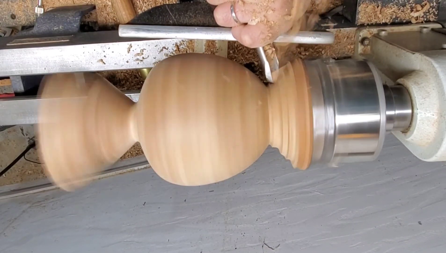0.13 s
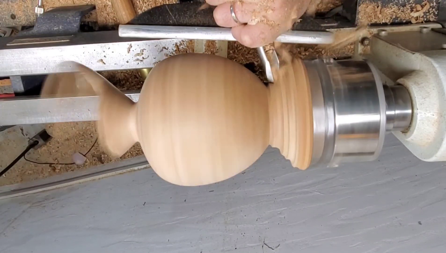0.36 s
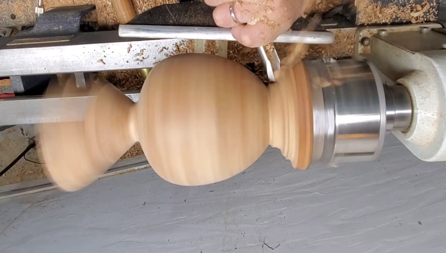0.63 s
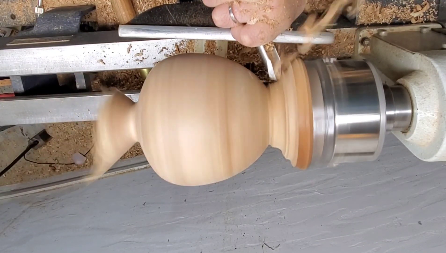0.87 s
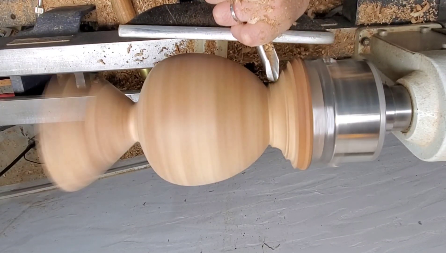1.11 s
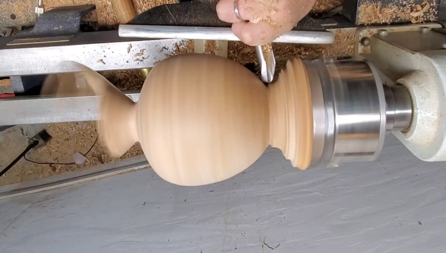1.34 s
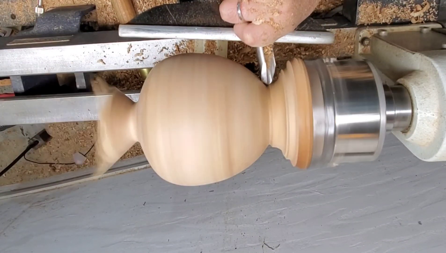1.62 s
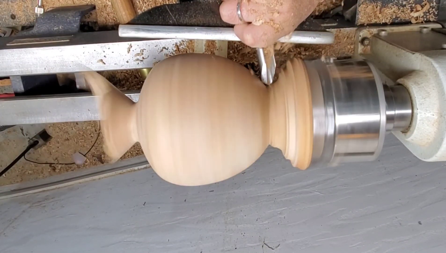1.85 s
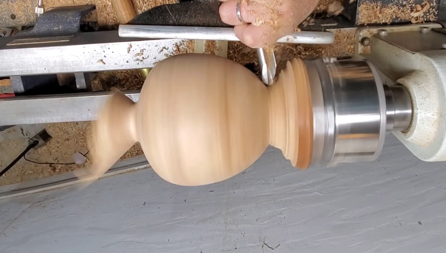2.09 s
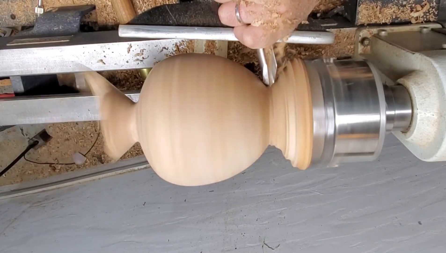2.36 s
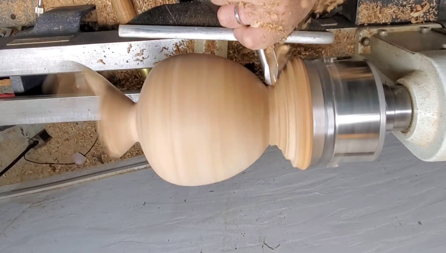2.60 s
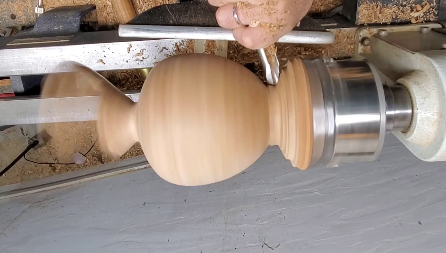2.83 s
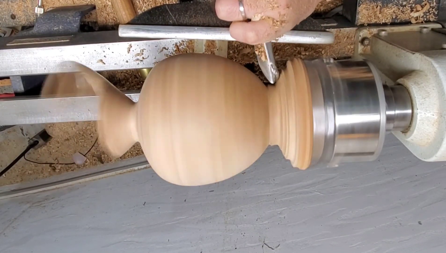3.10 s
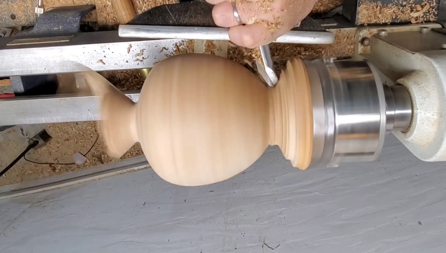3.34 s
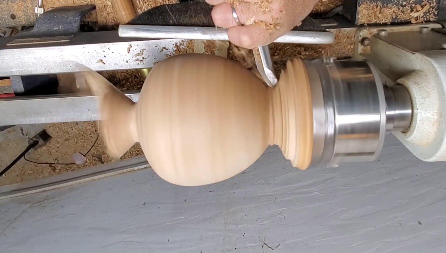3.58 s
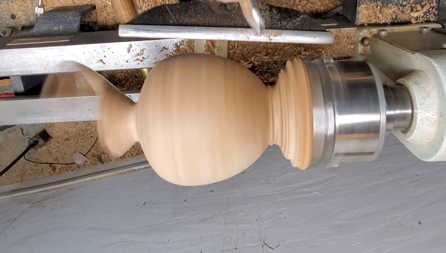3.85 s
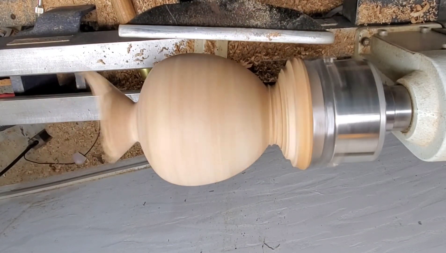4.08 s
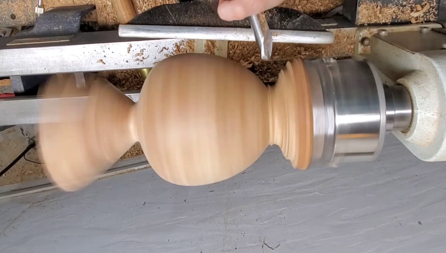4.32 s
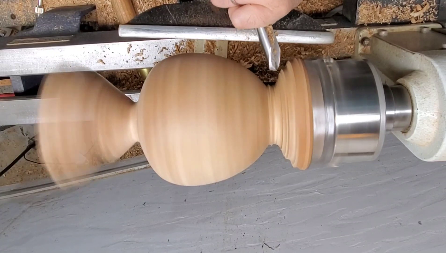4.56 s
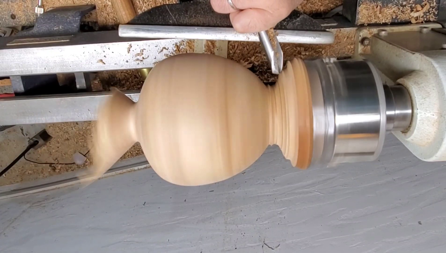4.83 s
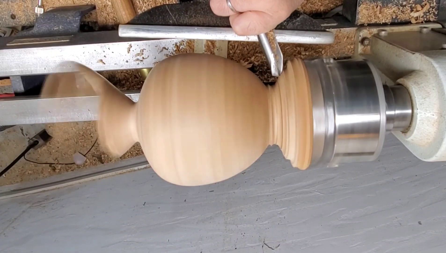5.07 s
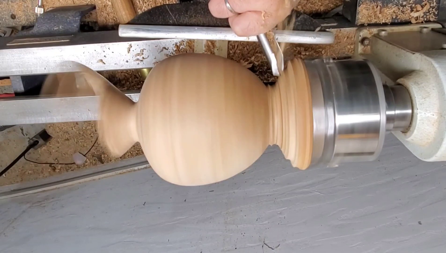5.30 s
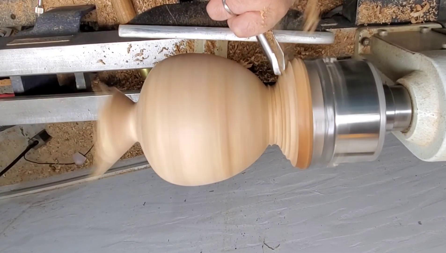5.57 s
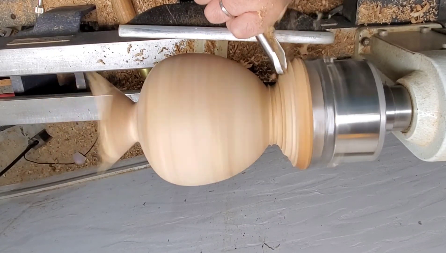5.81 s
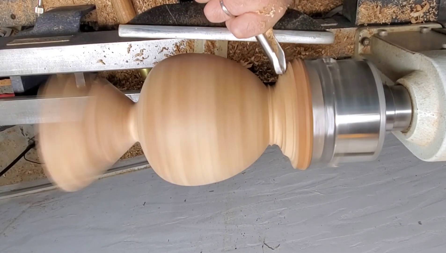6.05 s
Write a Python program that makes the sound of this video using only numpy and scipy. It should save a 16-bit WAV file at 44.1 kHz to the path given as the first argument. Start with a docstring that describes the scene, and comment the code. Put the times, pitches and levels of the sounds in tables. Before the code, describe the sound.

A wood lathe runs throughout, heard close and dry in stereo: a thin, steady high electric whine with fainter side tones over a soft hum and whirr of belt and fan. From the start to about 1.1 seconds a gouge shaves the spinning vase with a loud, bright tearing hiss, pulsing around twenty times a second, with small knocks and rattles of the tool rest. The motor is left alone until 1.6, when a quieter but rougher pass begins, hollow, woody and chattering, with many jolts around 2.4 to 2.9. After a short gap, a smoother, softer cut with a steely ring runs from 3.3 to 3.9. In the longer pause, at about 4.4, steel clacks and scrapes briefly on the rest. The whine grows slightly, then from 5.2 a strong, crisp, cleaner hiss runs to about 6.1 and drops away.

```python
"""A gouge shaves a spinning wooden vase in four passes, hissing and rattling, in close stereo.
Tearing fibres, as noise, shake the tool rest, wood and steel, modelled as resonances; the wood's high
side swings the level once a turn, and the edge catches in short jolts.
A motor drive whines throughout as steady tones over the coloured noise of belt and fan.
In the pause before the last pass the gouge is set down on the rest: ringing modes and a scrape."""
import sys
import numpy as np
from scipy import signal
from scipy.fft import rfft, irfft, next_fast_len
from scipy.io import wavfile
from scipy.ndimage import uniform_filter1d, map_coordinates

SR = 44100
rng = np.random.default_rng(int(sys.argv[2]) if len(sys.argv) > 2 else 0)


def convert_level_to_amplitude(level_db):
    """Map a level in decibels to its linear amplitude factor."""
    exponent = np.asarray(level_db, float) / 20
    return 10 ** exponent


def generate_wav(sig):
    """Save sig (samples, or channels by samples) to the path in sys.argv[1] as 16-bit PCM at SR."""
    pcm = np.round(np.clip(np.atleast_2d(sig).T, -1, 1) * 32767).astype(np.int16)
    wavfile.write(sys.argv[1], SR, pcm)


N = 272538
T = np.arange(N) / SR


def along(points, hz):
    """Interpolates (Hz, value) points on a log frequency axis."""
    f, v = np.transpose(points)
    return np.interp(np.log(hz + 1), np.log(f + 1), v)


def curves(rows):
    """One value per sample for each column after the time."""
    s, *cols = np.transpose(rows)
    return np.array([np.interp(T, s, c) for c in cols])


def wobble(knots_per_s):
    """A smooth random curve through normally distributed knots."""
    knots = rng.standard_normal(int(N * knots_per_s / SR) + 4)
    return map_coordinates(knots, [T * knots_per_s])


def modes(table, hz):
    """Causal response of resonances in parallel, alternating in sign."""
    total = 0
    for k, (centre_hz, width_hz, db) in enumerate(table):
        damping = 1j * hz * width_hz
        total = total + (-1) ** k * convert_level_to_amplitude(db) * damping / (centre_hz ** 2 - hz ** 2 + damping + 1e-9)
    return total


# Microphone pair. Each row: frequency in Hz, left-right likeness (0-1), left over right in dB,
# lead of left in radians.
PORTS = [(40, .97, 1.5, .1), (150, .99, 1.2, .1), (450, .95, 2.1, .2), (740, .75, 3.5, .5),
         (1000, .35, 3, 1.3), (1270, .3, 3, 1.5), (1430, .4, 1.5, -1.2), (1545, .6, 7, .5),
         (1910, .5, 6, -.7), (2190, .65, 1.5, -.8), (2700, .3, 2.2, .1), (3250, .5, 4, 1.8),
         (4000, .3, 2.2, .1), (4480, .5, 2.2, -1.5), (6300, .15, 2.2, -2.1), (8230, .3, 2.5, -.4),
         (10000, .1, 1.5, 2), (14000, .1, 1.5, 2.2)]


def heard(drive, colour, blows=0, lo_hz=0, hi_hz=SR):
    """Driven noise plus blows, coloured, at both ports; unit drive gives rms 1 between lo and hi."""
    m = next_fast_len(N + 8192)
    hz = np.fft.rfftfreq(m, 1 / SR)
    gain = colour(hz)
    in_band = (hz >= lo_hz) * (hz < hi_hz)
    gain = gain / np.sqrt(np.mean(np.abs(gain) ** 2 * in_band))
    alike, left_db, lead_rad = (along([(row[0], row[k]) for row in PORTS], hz) for k in range(1, 4))
    alike = np.clip(alike, 0, 1)
    shared, own = rfft(drive * rng.standard_normal((2, N)) + blows, m) * gain
    left = shared * convert_level_to_amplitude(left_db / 2)
    right = alike * np.exp(-1j * lead_rad) * shared + np.sqrt(1 - alike ** 2) * own
    right = right / convert_level_to_amplitude(left_db / 2)
    middle = np.sqrt((1 + alike * np.cos(lead_rad)) / 2)  # what the sum of both ports keeps
    return irfft(np.array([left, right]) / middle, m)[:, :N]


def tone(hz, left_db, right_db, lead_rad, waver_rad):
    """A slightly unsteady sine, reaching the two ports differently."""
    phase = 2 * np.pi * hz * T + waver_rad * wobble(7)
    ports = np.array([[lead_rad / 2], [-lead_rad / 2]])
    ports = ports + 0.081 * np.array([wobble(3.0), wobble(3.27)])
    level_db = np.array([[left_db], [right_db]]) + 0.23 * wobble(10)
    return np.sqrt(2) * convert_level_to_amplitude(level_db) * np.sin(phase + ports)


# Passes of the gouge. Each row: time in seconds, shaving hiss in dB, then over the hiss in dB:
# depth of cut, ring of the gouge, chatter of the rest.
PASSES = [
    [(0.0, -30, -1.5, -1, -8), (0.2, -31.5, 1.5, -3.5, -6.5), (0.55, -33.5, -1.5, -5, -3.5),
     (0.9, -31, -2, -6, -6), (1.006, -32.5, -2, -3, -7), (1.12, -60.5, -8, -2, 5)],
    [(1.582, -70, 6, -5, -10), (1.598, -50, 4, -3, -12), (1.654, -54, 12, -5, -14),
     (1.69, -42, 7, 2.5, -24), (1.8, -38.5, 10, -1.5, -16), (1.92, -35, 9.5, 1.5, -6),
     (2.55, -36.5, 12.5, 2, -14.5), (2.75, -36, 6, -1.5, -3.5), (2.9, -34, 7, -3.5, -3),
     (2.924, -50, 2, 1, 9), (2.98, -69, 4, -4, 1)],
    [(3.22, -63, 7, 5, 2), (3.306, -59, 16, 1, 6), (3.312, -39.5, 6, 5.5, -1), (3.5, -38, 7.5, 6, -5),
     (3.7, -37.5, 6, 7, -9), (3.716, -39, 4.5, 8.5, -4), (3.884, -40.5, 5.5, 8.5, -8),
     (3.89, -57, 1, 1, -6), (3.906, -72, 1, 5, -6)],
    [(5.14, -62, -13, -2, -12), (5.212, -33.5, -9, 1, -10), (5.42, -31.5, -5.5, 4, -13.5),
     (5.56, -30, -5.5, 0, -12), (5.8, -31.5, -3, -1.5, -18.5), (6.016, -33, 2.5, 0.5, -12),
     (6.094, -39, -5, 0, -20), (6.1, -46, -8, -4, -24), (6.18, -45, -8, -4, -26)],
]


def gouge():
    """Hiss gain, depth, ring and chatter (dB) of the pass under way; hiss gain is zero between passes."""
    on = [(T >= rows[0][0]) & (T <= rows[-1][0]) for rows in PASSES]
    hiss_db, *rest_db = sum(curves(rows) * cuts for rows, cuts in zip(PASSES, on))
    return convert_level_to_amplitude(hiss_db) * sum(on), *rest_db


# Spindle by stretches. Each row: time in seconds when the high side first meets the edge,
# speed in turns per second, out of round (0-1).
SPINDLE = [(0.0, 18.13, .35), (1.65, 20.5, .17), (2.122, 19.7, .2), (2.528, 20, .42), (3.31, 21.2, .13),
           (5.2, 20.2, .3)]


def spindle():
    """Turns counted from the high side, and how far out of round the wood is."""
    starts = [row[0] for row in SPINDLE]
    stretch = np.maximum(np.searchsorted(starts, T) - 1, 0)
    start_s, turns_per_s, out_of_round = np.transpose(SPINDLE)[:, stretch]
    return (T - start_s) * turns_per_s, uniform_filter1d(out_of_round, size=SR // 10)


# Edge catching in hard grain. Each row: start in seconds, strength in dB before each part's gain,
# neck over whole cut in dB.
CATCHES = [(0.1063, -12, -4), (0.4379, -17, -3), (0.4828, -11, -1), (0.6055, -12, -11), (0.6497, -10.5, -5),
           (0.7724, -14, -13), (0.8133, -16, -19), (0.8673, -15, -14), (1.6767, -19, -15),
           (1.8272, -15, -16), (1.8824, -15, -1), (1.926, -13, 1), (1.9899, -10, -8), (2.2069, -15, -16),
           (2.413, -16, -10), (2.4698, -13, -5), (2.5197, -8.5, -4), (2.579, -10, -21),
           (2.6264, -13.5, -17), (2.6793, -11.5, -6), (2.724, -15, -13), (2.825, -11.5, -18),
           (2.8759, -15, -8), (5.3467, -21, 5)]
# small snag of every turn, over shaking of the cut times bulge
SNAG_DB, SNAG_SPREAD_DB, SNAG_SCATTER_S, SNAG_NECK_DB = 16, 3.5, .004, -15


def catches(shaking, turns):
    """Decaying runs of jolts as the edge digs in or the high side snags: whole-cut row, neck row."""
    out, t = np.zeros((2, N + SR)), np.arange(SR // 200) / SR
    passing = np.flatnonzero((np.diff(turns % 1) < -.5) & (shaking[1:] > 0))
    late, size, neck = rng.standard_normal((200, 3))[:len(passing)].T
    snag_s = np.abs(T[passing] + SNAG_SCATTER_S * late)
    snag_db = 20 * np.log10(shaking[passing + 1]) + SNAG_DB + SNAG_SPREAD_DB * size
    snags = zip(snag_s, snag_db, SNAG_NECK_DB + SNAG_SPREAD_DB * neck)
    for s, db, neck_db in [*CATCHES, *snags]:
        jolts = rng.standard_normal(len(t)) * np.exp(-t / 0.0015)
        strength = convert_level_to_amplitude(db + np.array([[0], [neck_db]]))
        out[:, round(s * SR):][:, :len(t)] += strength * jolts / np.linalg.norm(jolts)
    return out[:, :N]


# Shavings peeling off. Each row: frequency in Hz, density in dB per Hz.
SHAVING = [(60, -5), (250, 4), (650, -9.5), (1000, -5), (1800, 7.5), (2650, 7), (3900, 6.5), (5700, 1),
           (9000, 0.5), (11500, 0), (15500, -11)]
# Narrow peaks in the hiss. Each row: frequency in Hz, width in Hz, level in dB.
HISS_PEAKS = [(6220, 87, 2.3), (6960, 126, 3.6), (8300, 85, 1.8)]


def shaving_hiss(hiss, high_side, grain, tearing, blow):
    """Peeling fibres: broad noise that swells with high side, end grain and tearing."""
    peel = lambda hz: convert_level_to_amplitude(along(SHAVING, hz)) * (1 + np.abs(modes(HISS_PEAKS, hz)))
    swing_db = 4 * high_side + .5 * grain + 1.17 * tearing + 0.88 * wobble(700)
    return heard(hiss * convert_level_to_amplitude(swing_db), peel, convert_level_to_amplitude(-15.0) * blow, lo_hz=5000, hi_hz=16200)


# Tool rest resonances. Each row: frequency in Hz, width in Hz, level in dB.
REST = [(153.4, 36, -10), (196.5, 20, -11)]


def rest_chatter(hiss, chatter_db):
    """The rest's lowest mode as a steady tone; its rougher, smaller share is in shaken_parts()."""
    return hiss * convert_level_to_amplitude(chatter_db) * tone(REST[0][0], 0.27, -0.79, 0.16, waver_rad=0.73)


# Resonances shaken by the cut. Each row: frequency in Hz, width in Hz, level in dB.
BED = [(286, 22.5, -3), (318, 34, -4), (424.6, 32, 3), (458.5, 9, 7.5), (522.6, 11.4, 0)]
CHUCK = [(741, 39, 6.5), (803.5, 19, 3), (967, 15.4, 5.5), (597, 1000, -3.5)]
BELLY = [(1252, 102, -7), (1413, 60, 4.5), (1549, 51, 4), (1670, 50, -2.5), (1916, 40, 2.5)]
NECK = [(2074, 46, 0.5), (2188, 60, 9.5)]
FOOT = [(2301, 58, 1), (2464, 164, -5)]
SHANK = [(2734, 24, -1), (2941, 61, 0.7)]
FLUTE = [(3250, 60, -1), (3360, 70, -3), (3450, 90, 0), (3600, 70, -5)]
TIP = [(4225, 24, 0.5), (4380, 92, 2), (4460, 240, 4.5), (4984, 57, -0.5), (5260, 126, -3.5)]
SPRAY = [(14100, 3600, 0)]


def shaken_parts(hiss, depth_db, ring_db, chatter_db, high_side, grain, tearing, blow, neck_blow):
    """Tearing noise and blows through each part's resonances: wood follows depth, steel the ring."""
    # the shank answers best to a middling ring
    shank_db = 0.0 - .65 * np.abs(ring_db - .8)
    foot_db = -1.5 + 0.43 * depth_db + .45 * ring_db
    flute_db = -6.0 + 0.29 * depth_db + 1.56 * ring_db
    tip_db = -2 + 0.43 * depth_db - 0.068 * ring_db
    # Each row: part, level over hiss in dB, swing with the turn in dB, shared tearing in dB,
    # own flutter in dB, blows.
    parts = [
        (REST, -6.5 + chatter_db, 1.5, .3, .3, convert_level_to_amplitude(-3) * blow),
        (BED, -4.5 + 0.38 * depth_db, 1.5, .6, .8, convert_level_to_amplitude(-4.0) * blow),
        (CHUCK, -8.0 + 0.56 * depth_db, 4, 1.2, .8, convert_level_to_amplitude(2) * blow),
        (BELLY, -1.0 + depth_db, 16, 1.5, 1.2, convert_level_to_amplitude(11.5) * blow),
        (NECK, -1 + 0.64 * depth_db, 9, 1.5, 1.2, convert_level_to_amplitude(15) * neck_blow),
        (FOOT, foot_db, 9, 1.5, 1.2, convert_level_to_amplitude(0) * neck_blow),
        (SHANK, shank_db, 4, 1.5, 1.2, convert_level_to_amplitude(-17) * blow),
        (FLUTE, flute_db, 4, 1.5, .6, convert_level_to_amplitude(-21) * blow),
        (TIP, tip_db, 3, 1.5, 1.5, convert_level_to_amplitude(-3) * blow),
        (SPRAY, -5.5 + 0.26 * ring_db, 4, 1.2, .6, convert_level_to_amplitude(-26) * blow)]
    out = np.zeros((2, N))
    for part, level_db, turn_db, tear_db, own_db, blows in parts:
        drift_db = 1.73 * wobble(6)  # the gouge swings and grips each part a little differently
        swing_db = turn_db * high_side + 0.31 * grain + tear_db * tearing + own_db * wobble(45)
        out += heard(hiss * convert_level_to_amplitude(level_db + drift_db + swing_db), lambda hz: modes(part, hz), blows)
    return out


def cutting():
    """Uneven tearing of fibres drives the hiss and every resonant part."""
    hiss, depth_db, ring_db, chatter_db = gouge()
    turns, out_of_round = spindle()
    angle = 2 * np.pi * turns
    # the bulge is narrower than the hollow
    high_side = out_of_round * (np.cos(angle) + 0.059 * np.cos(2 * angle))
    grain = np.cos(2 * angle + 2.0)  # end grain meets the edge twice a turn
    tearing = wobble(160)  # bites of a few ms, shared by hiss and parts
    blow, neck_blow = catches(hiss * convert_level_to_amplitude(depth_db) * out_of_round, turns)
    out = shaving_hiss(hiss, high_side, grain, tearing, blow)
    out += rest_chatter(hiss, chatter_db)
    out += shaken_parts(hiss, depth_db, ring_db, chatter_db, high_side, grain, tearing, blow, neck_blow)
    return out


# Motor drive. Each row: time in seconds, carrier in dB, whirr in dB.
MOTOR = [(0, -38, -35.5), (.95, -36.5, -42), (1.1, -35.5, -42.5), (1.62, -38.5, -42.5), (1.8, -35, -40),
         (2.85, -36, -42), (2.97, -37.5, -43.5), (3.22, -39.5, -42.5), (3.4, -33, -33), (3.9, -34.5, -38.5),
         (4.5, -32, -37), (5.19, -30.5, -34.5), (5.4, -38, -39.5), (6, -33, -37.5), (6.18, -34.5, -44)]
# Drive tones beside the carrier. Each row: frequency in Hz, left in dB, right in dB,
# lead of left in radians.
TONES = [(872.6, -4, -20, 1.7), (1127.3, 0, -3, .7), (1745.3, -11, -13, -.1), (2254.5, -11, -17, 3),
         (4000, -19, -23, 2)]
# Belt and pulley hum. Each row: frequency in Hz, left in dB, right in dB, lead of left in radians.
HUM = [(299.6, -12, -18, 0.22), (374.3, -6, -15.5, 0.33), (686, -25, -6, 0.75)]
# Belt, fan and bearings. Each row: frequency in Hz, density in dB per Hz.
WHIRR = [(15, -49), (25, -20.5), (100, -2.5), (216, -11), (306, -3.5), (807, -14.5), (950, -17.5),
         (1110, -5), (1620, -14), (2180, -17), (2900, -18), (4300, -26), (5200, -24.5), (8000, -29.5),
         (15600, -37)]
# Housing resonances. Each row: frequency in Hz, width in Hz, level in dB.
HOUSING = [(75, 5.4, 5.1), (125, 15, 3.8), (309.2, 3.5, 11.7), (394, 8, 3.7), (659, 83, 5.3),
           (1490, 10, 1.7), (1894, 54, 9.9), (2730, 68, 3.1), (3190, 50, 1.3), (4000, 240, 3),
           (5920, 67, 5.6), (6540, 330, 5.2)]
# side tones over the whirr, their dip under load, hiss level above which the motor is loaded
SIDE_DB, LOAD_DIP_DB, LOADED_DB = -0.84, 8.5, -43


def motor():
    """Switching carrier and side tones over hum and whirr; side tones sink while the cut loads it."""
    carrier_db, whirr_db = curves(MOTOR)
    load = uniform_filter1d(1. * (gouge()[0] > convert_level_to_amplitude(LOADED_DB)), size=SR // 25)
    whine = convert_level_to_amplitude(carrier_db) * tone(2000, 4.16, -2.0, -1.35, waver_rad=0.11)
    side_db = whirr_db + SIDE_DB - LOAD_DIP_DB * load
    sides = convert_level_to_amplitude(side_db) * sum(tone(*row, waver_rad=0.41) for row in TONES)
    hum = convert_level_to_amplitude(whirr_db - 5.5) * sum(tone(*row, waver_rad=1.35) for row in HUM)
    body = lambda hz: convert_level_to_amplitude(along(WHIRR, hz)) * (1 + np.abs(modes(HOUSING, hz)))
    return whine + sides + hum + heard(convert_level_to_amplitude(whirr_db + 1.4 * wobble(19)), body)


# Gouge set on the rest. Each row: start in seconds, relative level in dB,
# offsets of the second-highest and highest modes in dB.
TAPS = [(4.414, -35, -10, 2), (4.421, -19, -18, -18), (4.4385, -18, -20, -26), (4.447, -25, -16, -26),
        (4.4525, -27, -7, -20)]
# Ring of the steel. Each row: frequency in Hz, level in dB, t60 in seconds.
STEEL = [(750, -9, .03), (1300, -8, .03), (1700, -8, .04), (2430, 0, .045), (2620, -2, .035),
         (3400, -12, .03), (4650, 0, .035), (6620, 0, .06)]


def taps():
    """Each touch of steel on steel rings in decaying modes and scrapes as smoothed noise."""
    out, t = np.zeros((2, N + SR)), np.arange(SR // 8) / SR
    hz, mode_db, t60_s = np.transpose(STEEL)[..., None]
    for s, db, *upper_db in TAPS:
        offset_db = np.r_[np.zeros(len(STEEL) - 2), upper_db][:, None]
        level_db = mode_db + offset_db + rng.normal(0, 3.0, (2, len(STEEL), 1))
        sines = np.sin(2 * np.pi * (hz * t + rng.random(level_db.shape) / 4))
        ring = np.sum(convert_level_to_amplitude(level_db - 60 * t / t60_s) * sines, axis=1)
        rough = uniform_filter1d(rng.standard_normal((2, len(t))), size=4)
        scrape = 1.55 * convert_level_to_amplitude(-60 * t / 0.058) * uniform_filter1d(rough, size=4)
        onset = 1 - np.exp(-t / 0.00067)
        out[:, round(s * SR):][:, :len(t)] += convert_level_to_amplitude(db - 1.5) * onset * (ring + scrape)
    return out[:, :N]


def scene():
    """Cut, motor and taps together."""
    return cutting() + motor() + taps()


def roll_off(x):
    """The treble ends steeply here."""
    return signal.sosfilt(signal.butter(12, 16300, fs=SR, output="sos"), x)


def record(dry):
    """Turns the dry mix into the sound that is written out."""
    return roll_off(dry)


dry = scene()
out = record(dry)
generate_wav(out)
```